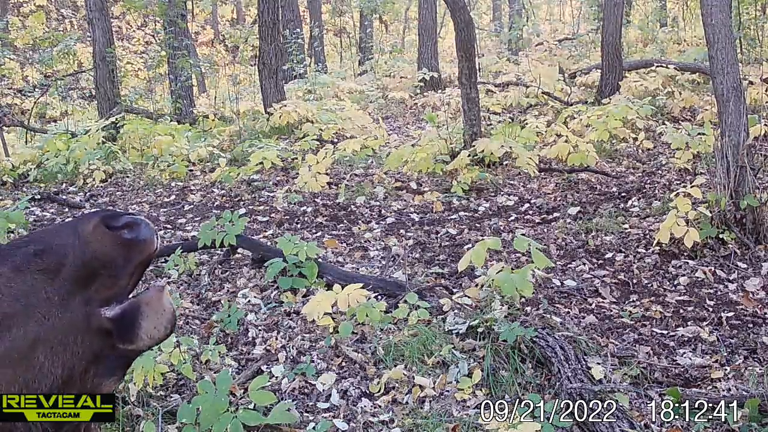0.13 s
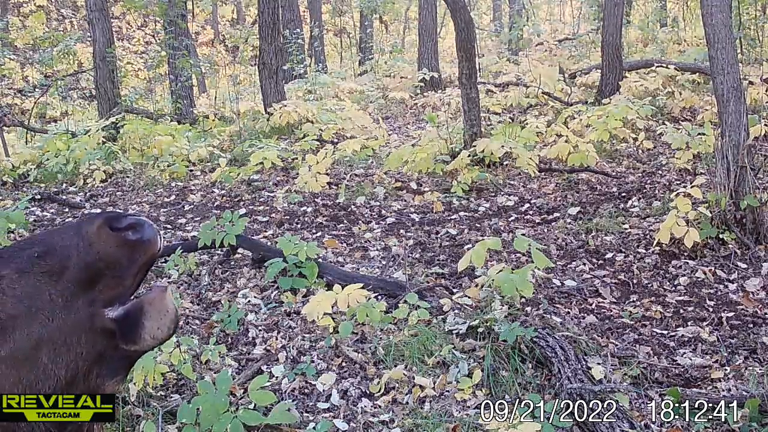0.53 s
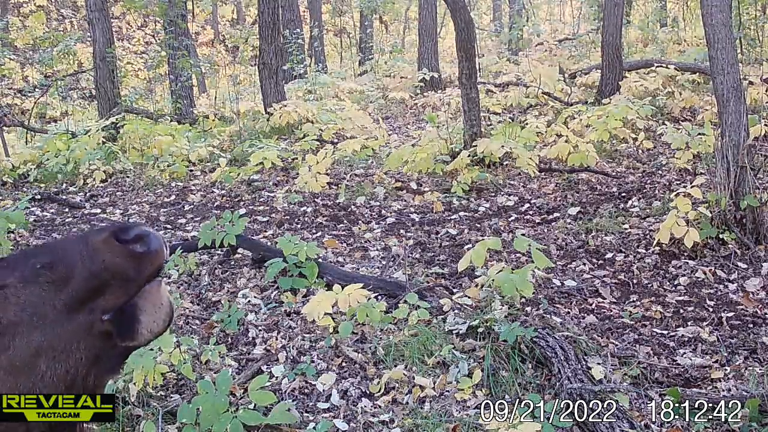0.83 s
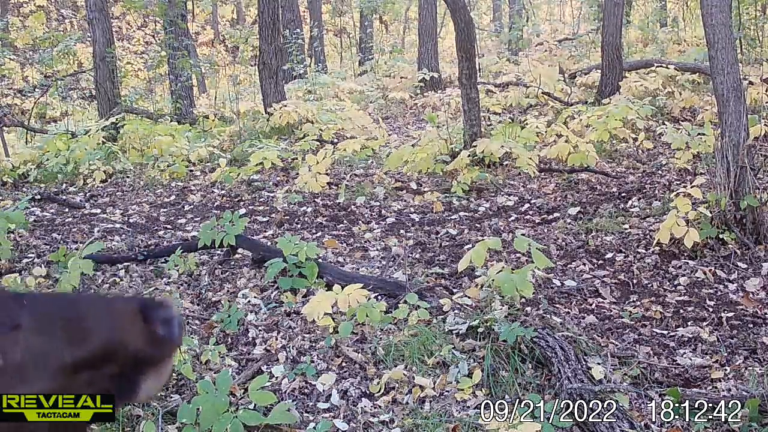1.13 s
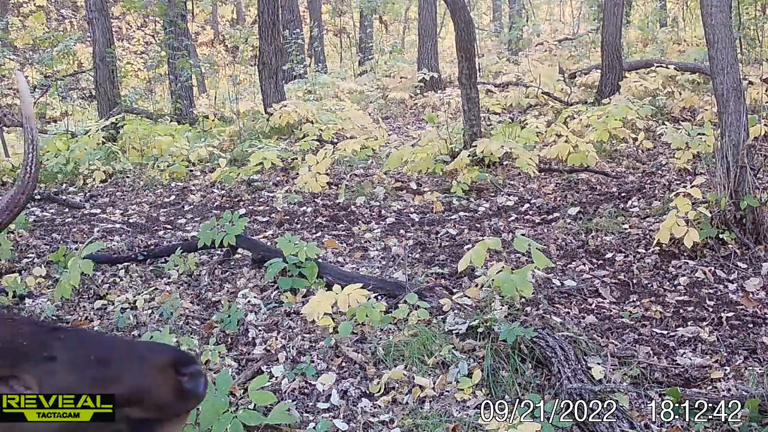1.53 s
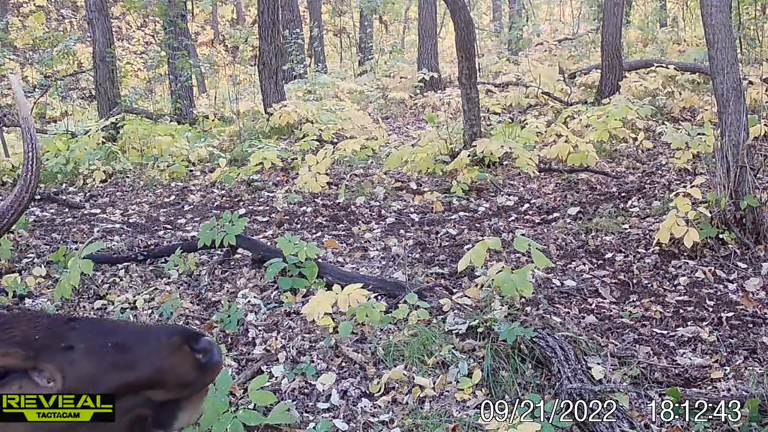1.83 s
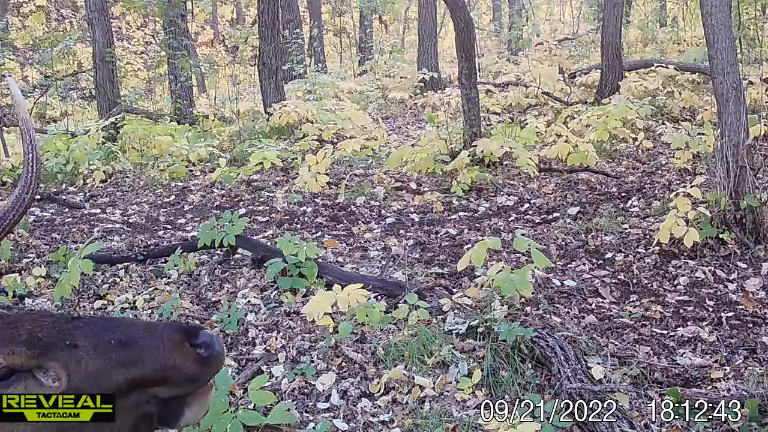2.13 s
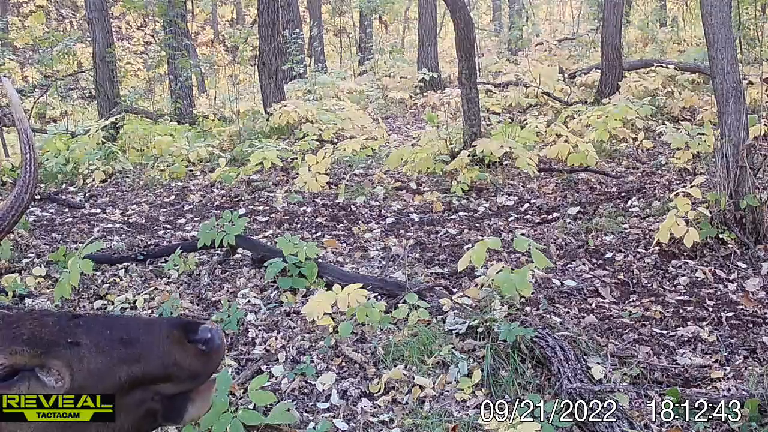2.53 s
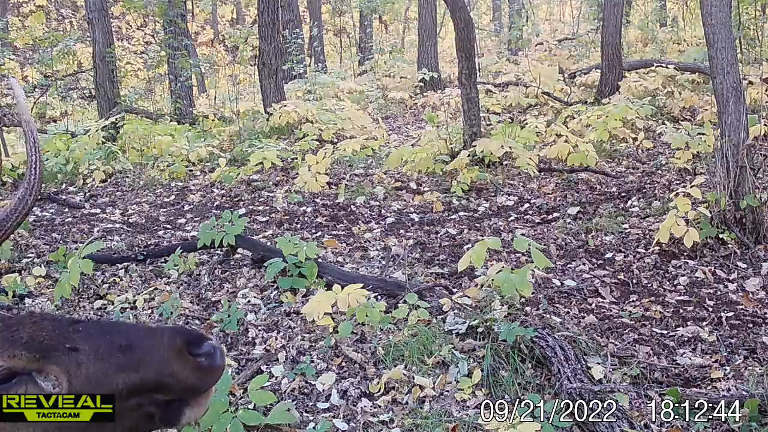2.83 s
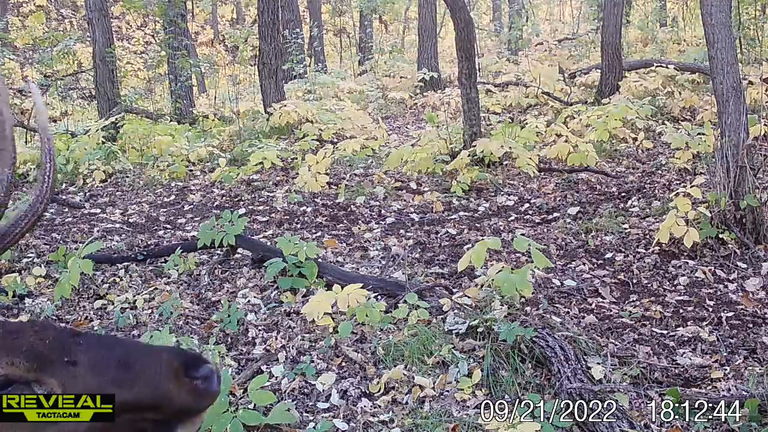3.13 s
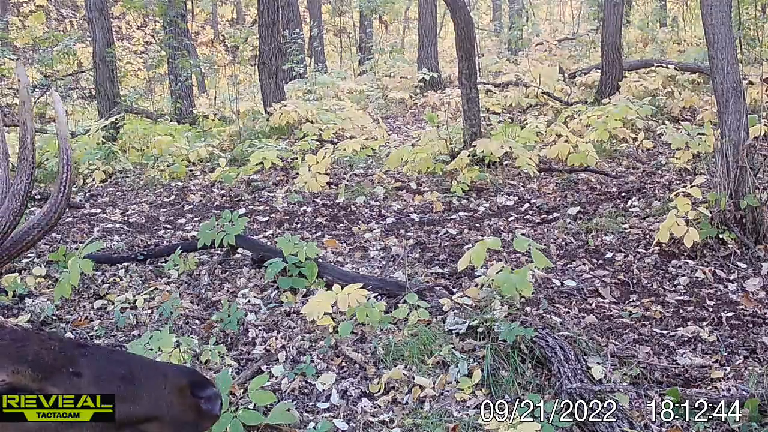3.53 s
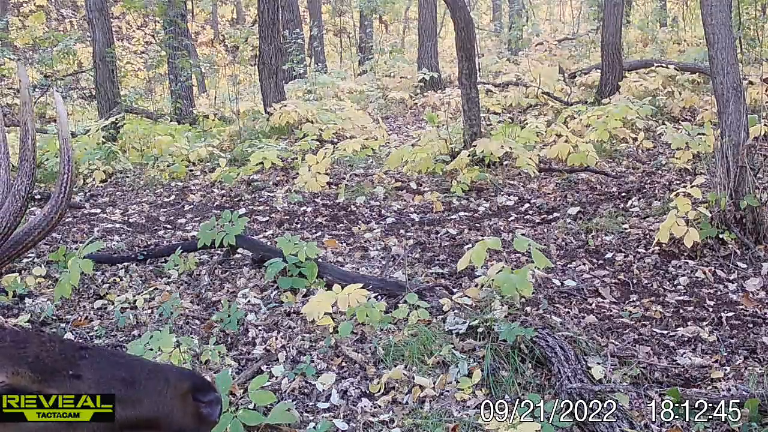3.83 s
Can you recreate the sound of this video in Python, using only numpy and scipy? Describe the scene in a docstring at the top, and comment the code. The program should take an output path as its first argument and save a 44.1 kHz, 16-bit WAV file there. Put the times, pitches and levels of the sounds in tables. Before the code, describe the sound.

A bull elk bugles loudly right beside the microphone, a piercing whistle turning rough and dropping in pitch within a second. A nasal puff and brief woodland echo follow, then faint hiss with tiny bird chips.

```python
"""In a quiet forest, over a faint steady hiss, a bull elk bugles close to the microphone.
A piercing whistle comes first; within 0.2 s it breaks into a harsh roar: the vocal folds beat at
about 120 to 140 Hz and shake the whistle, which steps down in pitch as the mouth closes over the treble.
Breath hisses from the nostrils as the call ends and dies away among the trees.
Then only the hiss is left, with a thin drone and four tiny bird chips, each falling in pitch."""
import sys
import numpy as np
from scipy import signal
from scipy.fft import rfft, irfft
from scipy.io import wavfile

SR = 44100
rng = np.random.default_rng(int(sys.argv[2]) if len(sys.argv) > 2 else 0)


def int16_out(signal):
    """Quantize to a 16-bit WAV file."""
    q = np.round(np.clip(np.atleast_2d(signal).T, -1, 1) * 32767)
    wavfile.write(sys.argv[1], SR, q.astype(np.int16))


N = 176400
T = np.arange(N) / SR


def from_db(db):
    """Decibels to gain."""
    return 10 ** (np.asarray(db) / 20)


def rms_one(x):
    """Scale to unit rms."""
    return x / np.sqrt(np.mean(x ** 2) + 1e-20)


def in_time(rows):
    """Each column of a curve, joined by straight lines, at every sample."""
    s, *columns = np.transpose(rows)
    return [np.interp(T, s, column) for column in columns]


def during(rows):
    """One while a curve lasts, zero outside it."""
    return (T >= rows[0][0]) & (T <= rows[-1][0])


def at_hz(points, hz, axis=1):
    """Read one column of a spectrum on a log-frequency axis."""
    table = np.array(points)
    return np.interp(np.log(np.maximum(hz, 1)), np.log(table[:, 0]), table[:, axis])


def drift(rate_hz):
    """Smooth random wander of unit rms: noise through two equal one-pole low-passes."""
    r = np.exp(-2 * np.pi * rate_hz / SR)
    noise = rng.standard_normal(N + SR)
    wander = signal.lfilter([1], [1, -2 * r, r * r], noise)
    return rms_one(wander[SR:])  # the first second lets the filter settle


def turn(hz):
    """Running phase of a pitch curve, in radians."""
    return 2 * np.pi * np.cumsum(hz) / SR


def colour(x, points):
    """Causal (minimum-phase) filter with the given spectrum, made by folding its cepstrum."""
    size = 2 * N
    gain = from_db(at_hz(points, np.arange(N + 1) * SR / size))
    cepstrum = irfft(np.log(gain))
    cepstrum[1:N] *= 2
    cepstrum[N + 1:] = 0
    return irfft(rfft(x, size) * np.exp(rfft(cepstrum)))[:N]


def resonate(x, peaks):
    """Narrow two-pole, two-zero filters ring at some pitches and weaken others."""
    for hz, width_hz, db in peaks:
        middle = -2 * np.cos(2 * np.pi * hz / SR)
        half = np.pi * width_hz / SR
        gain = from_db(db / 2)
        zeros = [1 + half * gain, middle, 1 - half * gain]
        poles = [1 + half / gain, middle, 1 - half / gain]
        x = signal.lfilter(zeros, poles, x)
    return x


# Colour of the quiet air around the microphone, relative: f/Hz, level/dB
AIR = [(20, -12.5), (64, -1), (119, -5.5), (445, -7), (782, -5), (848, -7.5), (3530, -13.5), (15500, -18.5)]
AIR_DB = -64.5  # rms
DRONE_HZ, DRONE_WANDER_HZ, DRONE_DB = 800, 20, -78.5


def air():
    """Coloured noise is the steady hiss; two drifting quadrature tones make a narrow drone."""
    hiss = rms_one(colour(rng.standard_normal(N), AIR))
    angle = 2 * np.pi * DRONE_HZ * T
    drone = drift(DRONE_WANDER_HZ) * np.sin(angle) + drift(DRONE_WANDER_HZ) * np.cos(angle)
    return from_db(AIR_DB) * hiss + from_db(DRONE_DB) * drone


# Bird chips, heard faintly: onset t/s, level/dB one decay time after the onset
CHIPS = [(1.174, -72), (1.78, -74.5), (2.68, -72.5), (3.345, -74)]
CHIP_FROM_HZ, CHIP_TO_HZ = 8300, 7000
CHIP_FALL_S, CHIP_DECAY_S = 0.004, 0.018  # time constants


def birds():
    """Each chip is a tone that drops quickly in pitch, swells fast and decays."""
    chips = 0
    for onset_s, db in CHIPS:
        age = np.maximum(T - onset_s, 0)
        fall = (CHIP_FROM_HZ - CHIP_TO_HZ) * np.exp(-age / CHIP_FALL_S)
        hz = CHIP_TO_HZ + fall + 110 * drift(400)
        swell = np.sqrt(age / CHIP_DECAY_S) * np.exp(1 - age / CHIP_DECAY_S)
        chips = chips + from_db(db) * swell * np.sin(turn(hz))
    return chips


# Echo of near trunks, per band before its width counts: f/Hz, level/dB, 60 dB decay t/s
NEAR_TRUNKS = [(200, -21, .45), (600, -20.5, .48), (1200, -26, .33), (2500, -22, .45), (9970, -22, .35)]
# Long tail from far trunks, same columns: f/Hz, level/dB, 60 dB decay t/s
FAR_TRUNKS = [(200, -44, 1.5), (640, -34, 1.7), (1200, -45, 1), (10000, -63, .4)]


def forest(x):
    """Noise bands with their own decays: scatter from near trunks and a faint tail from far ones."""
    t = T[:2 * SR]
    build_up = 1 - np.exp(-(t / .035) ** 2)
    response = 0
    edges = np.geomspace(100, 15000, 9)
    for low, high in zip(edges, edges[1:]):
        hz = np.sqrt(low * high)
        band_pass = signal.butter(2, [low, high], "band", fs=SR, output="sos")
        band = signal.sosfilt(band_pass, rng.standard_normal(len(t)))
        for table in (NEAR_TRUNKS, FAR_TRUNKS):
            fade = from_db(-60 * t / at_hz(table, hz, axis=2)) * build_up
            fade = fade / np.sqrt(np.sum(fade ** 2))
            response = response + band * from_db(at_hz(table, hz)) * fade
    return signal.fftconvolve(x, response)[:N]


# Narrow peaks and dips of the microphone's casing: f/Hz, width f/Hz, level/dB
CASING = [(430, 70, -13), (735, 57, -10), (771, 25, 7.5), (932, 78, -3.5), (995, 40, 7.5), (1181, 41, 9),
          (1530, 160, -14), (1651, 59, 11), (2020, 48, -8), (2747, 70, -12.5), (3710, 20, -14),
          (4190, 210, -12.5)]
HIGH_PASS_HZ = 122


def microphone(x):
    """The casing rings at some pitches, dips at others, and a high-pass takes off the bass."""
    high_pass = signal.butter(4, HIGH_PASS_HZ, "high", fs=SR, output="sos")
    return signal.sosfilt(high_pass, resonate(x, CASING))


# Hiss from the nostrils, rms: t/s, level/dB
SNORT = [(.66, -59.5), (.74, -39), (.82, -47.5), (.91, -60)]
# Colour of that hiss, relative: f/Hz, level/dB
SNORT_COLOUR = [(1500, -1.5), (6000, -13), (7900, -11.5), (12000, -39)]


def nostrils():
    """Coloured noise: the elk's last air hisses out through its nose."""
    hiss = rms_one(colour(rng.standard_normal(N), SNORT_COLOUR))
    level_db, = in_time(SNORT)
    return from_db(level_db) * during(SNORT) * hiss


# Upper edge of the voice as the mouth closes, 3 dB down: t/s, f/Hz
MOUTH = [(.56, 17970), (.65, 6495), (.72, 3400), (.78, 1400)]


def mouth(x):
    """The closing mouth shuts off the treble from the top down: a falling low-pass."""
    hz, s, frames = signal.stft(x, SR)
    edge_s, edges = np.transpose(MOUTH)
    edge_hz = np.exp(np.interp(s, edge_s, np.log(edges)))
    gain = 1 / np.sqrt(1 + (hz[:, None] / edge_hz) ** 4)
    return signal.istft(frames * gain, SR)[1][:N]


# Beat of the vocal folds: t/s, f/Hz
FOLD_HZ = [(.13, 120.6), (.166, 130.5), (.216, 135.8), (.245, 140), (.28, 132.4), (.374, 123.2),
           (.534, 118.7), (.64, 118.2), (.72, 132), (.79, 127.8)]


def fold_beat():
    """Pitch of the vocal folds, and their running phase with a slight random wander."""
    fold_hz, = in_time(FOLD_HZ)
    return fold_hz, turn(fold_hz * (1 + 0.0036 * drift(60)))


SMEAR_S = 0.013  # time constant


def smear(x):
    """Scatter in the head and nearby ground blurs each pulse in time without colouring it."""
    response = rfft(rng.standard_normal(N) * np.exp(-T / SMEAR_S))
    return irfft(rfft(x) * response / np.abs(response))


# The roar, level of its rough part at unit rms: t/s, level/dB
ROAR = [(0, -58), (.12, -56), (.128, -29.5), (.15, -26.5), (.19, -18.5), (.25, -18.5), (.34, -19),
        (.45, -21), (.56, -24), (.68, -21.5), (.73, -25.5), (.775, -27.5), (.8, -36), (.915, -70.5)]
# How chaotic the beat of the folds is: t/s, chaos (0-1)
CHAOS = [(.275, .95), (.3, .4), (.37, .12), (.6, .3), (.7, .7)]
# Colour of the rough voice, relative: f/Hz, level/dB
TRACT = [(90, -58.5), (190, -45.5), (260, -23), (340, -32), (520, -6.5), (630, 0.5), (820, -9),
         (1200, -6.5), (1380, -8.5), (1660, -6), (2150, -4.5), (2600, -15.5), (3030, -11.5), (3380, -10.5),
         (4000, -24.5), (4950, -31.5), (5900, -26), (6350, -13.5), (6800, -30.5), (7900, -33),
         (8650, -27.5), (9150, -41), (11400, -42.5), (12200, -55)]
# Narrow resonances and dips of the throat and nose: f/Hz, level/dB
CAVITIES = [(1675, 7.5), (1810, 5), (2395, -11.5), (2500, 8), (3190, -7.5), (4680, 12.5), (5350, 7.5),
            (7380, 5), (9950, 5.5), (10480, -8.5)]
CAVITY_Q = 52
# Clean harmonics of the folds, before the boost and lift: multiple of the beat, level/dB
FOLD_LINES = [(1, -57.5), (2, -38), (3, -46.5), (4, -35), (5, -22.5), (6, -35), (7, -28.5)]
CLEAN_LIFT_DB = 21.0
THROAT_HZ, THROAT_HALF_WIDTH_HZ, THROAT_BOOST_DB = 550.7, 34, 19
PULSE_JITTER, PULSE_SHIMMER_DB = .035, 2.5  # jitter in cycles at full chaos
RASP_DB, RASP_GATE = -11, .4  # rasp relative to the pulses; how strongly the beat gates it


def rough_voice(folds, chaos):
    """Uneven fold pulses and puffs of rasp ring the throat and nose."""
    cycle = np.floor(folds / (2 * np.pi) + PULSE_JITTER * chaos * drift(130))
    cycle = np.maximum.accumulate(cycle)  # jitter never fires a cycle twice
    shimmer = from_db(PULSE_SHIMMER_DB * drift(140))
    pulses = rms_one(np.diff(cycle, prepend=cycle[0]) * shimmer)
    rasp = rms_one(rng.standard_normal(N) * np.exp(RASP_GATE * np.cos(folds)))
    rough = colour(smear(pulses) + from_db(RASP_DB) * rasp, TRACT)
    return rms_one(resonate(rough, [(hz, hz / CAVITY_Q, db) for hz, db in CAVITIES]))


def clean_voice(fold_hz, folds, chaos):
    """Sine harmonics swell near the throat's resonance; the upper ones emerge as chaos falls."""
    clean = 0
    for k, db in FOLD_LINES:
        offset = (k * fold_hz - THROAT_HZ) / THROAT_HALF_WIDTH_HZ
        boost_db = THROAT_BOOST_DB / (1 + offset ** 2)
        settled = 1 - chaos if k > 4 else 1
        gain = from_db(db + boost_db + 2.3 * drift(35))
        clean = clean + settled * gain * np.sin(k * folds + rng.uniform(0, 2 * np.pi))
    return clean


def roar(fold_hz, folds):
    """The vocal folds give rough pulses and clean harmonics under one level curve."""
    level_db, = in_time(ROAR)
    chaos, = in_time(CHAOS)
    voice = rough_voice(folds, chaos) + from_db(CLEAN_LIFT_DB) * clean_voice(fold_hz, folds, chaos)
    return during(ROAR) * from_db(level_db) * voice


# A second, weaker whistle inside the roar: t/s, f/Hz, level/dB
OVERTONE = [(.18, 1960, -60), (.22, 1935, -30), (.33, 1951, -28), (.42, 1950, -25), (.5, 1905, -30),
            (.6, 1805, -29), (.66, 1760, -52)]
SUM_TONE_DB = -10  # relative to the second whistle


def second_whistle(folds):
    """A thin unsteady tone pulsing with the folds, and its sum tone with the main whistle."""
    hz, level_db = in_time(OVERTONE)
    main_hz, = in_time(WHISTLE_HZ)
    phase = turn(hz * (1 + .003 * drift(120)))
    tone = np.sin(phase) + from_db(SUM_TONE_DB) * np.sin(phase + turn(main_hz))
    flutter = 1 + 0.65 * np.cos(folds) + 0.13 * drift(47)
    return from_db(level_db) * during(OVERTONE) * flutter * tone


# Pitch of the main whistle: t/s, f/Hz
WHISTLE_HZ = [(0, 1801), (.112, 1800), (.14, 1755), (.158, 1668), (.188, 1664), (.236, 1655), (.248, 1466),
              (.548, 1456), (.568, 1345), (.602, 1315), (.608, 1190), (.688, 1154), (.702, 1015),
              (.73, 990), (.745, 820), (.765, 795), (.769, 635), (.78, 610), (.781, 265)]
# Its strength: t/s, level/dB, 2nd partial level/dB, 3rd partial level/dB (partials re the first)
WHISTLE = [(0, -8.5, -33, -14.5), (.083, -7.5, -28.5, -8), (.105, -8, -23.5, -24), (.132, -13, -9, -13),
           (.152, -17.5, -22.5, -27.5), (.162, -12, -6, -24), (.178, -12.5, -2, -18),
           (.192, -21, -5.5, -16), (.225, -27, -12, -23), (.3, -28.5, -3, -23), (.43, -26, -10, -23),
           (.5, -26.5, 2.5, -23), (.555, -25.5, -7, -22), (.575, -20.5, -20.5, -29.5),
           (.64, -18.5, -17, -31), (.68, -12, -17.5, -23), (.692, -12.5, -7, -26.5),
           (.714, -15, -25.5, -34), (.752, -22.5, -7, -21.5), (.77, -12, -15, -36.5),
           (.786, -30, -3.5, -45.5), (.805, -48, 0, -34)]
# How hard the folds shake the whistle: t/s, depth (0-1)
SHAKE = [(.12, 0.07), (.18, 0.07), (.23, 0), (.4, 0.78), (.5, 0.05), (.63, 0.4), (.682, 0), (.698, 0.74),
         (.77, 0.1)]
SHAKE_RAD, WHISTLE_JITTER = .55, .008  # phase swing and pitch wander (fraction) at full depth
# Partials while the whistle briefly doubles its period: multiple of the pitch, level/dB
HALF_PARTIALS = [(.5, -29.5), (1.5, -26), (2.5, -38), (3.5, -29.5), (4.5, -35.5)]
DOUBLING_S, DOUBLING_WIDTH_S = .086, 0.015  # centre and standard deviation
# 4th partial at the start re the first; drop per higher partial; fade with time
UPPER_PARTIALS_DB, PARTIAL_FALL_DB, UPPER_FADE_DB_PER_S = -20, 15, 18
BREAK_RAD = 1.1  # phase scatter that breaks up the high partials once the folds beat


def whistle(folds):
    """A clear tone with partials; the beating folds shake its level and phase."""
    hz, = in_time(WHISTLE_HZ)
    level_db, second_db, third_db = in_time(WHISTLE)
    shake, = in_time(SHAKE)
    phase = turn(hz * (1 + WHISTLE_JITTER * shake * drift(100)))
    phase = phase + SHAKE_RAD * shake * np.sin(folds)
    scatter_rad = BREAK_RAD * (T > FOLD_HZ[0][0])
    tone = np.sin(phase) + from_db(second_db) * np.sin(2 * phase)
    for k in range(3, 9):
        upper_db = UPPER_PARTIALS_DB - UPPER_FADE_DB_PER_S * T - PARTIAL_FALL_DB * (k - 4)
        partial_db = third_db if k == 3 else upper_db
        tone += from_db(partial_db) * np.sin(k * phase + scatter_rad * drift(150))
    flutter = 1 + shake * (np.cos(folds) + 0.35 * drift(90))
    halves = sum(from_db(db) * np.sin(k * phase) for k, db in HALF_PARTIALS)
    doubling = np.exp(-.5 * ((T - DOUBLING_S) / DOUBLING_WIDTH_S) ** 2)
    return tone * flutter * from_db(level_db) * during(WHISTLE) + halves * doubling


def scene():
    """The quiet forest, the close elk and its echo among the trees."""
    fold_hz, folds = fold_beat()
    whistles = np.sqrt(2) * (whistle(folds) + second_whistle(folds))  # a sine's level becomes its rms
    voice = whistles + roar(fold_hz, folds)
    elk = microphone(mouth(voice) + nostrils())
    return (air() + birds() + forest(elk) + elk)[None]


CUTOFF_HZ = 15750


def record(dry):
    """Peaks stop at full scale, then a steep low-pass cuts the top."""
    low_pass = signal.ellip(12, .1, 90, CUTOFF_HZ, fs=SR, output="sos")
    return signal.sosfilt(low_pass, np.clip(dry, -1, 1))


dry = scene()
out = record(dry)
int16_out(out)
```